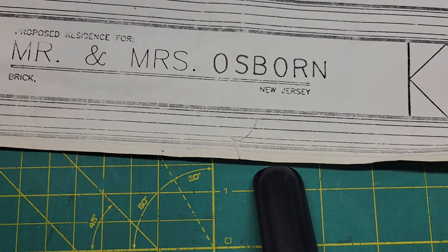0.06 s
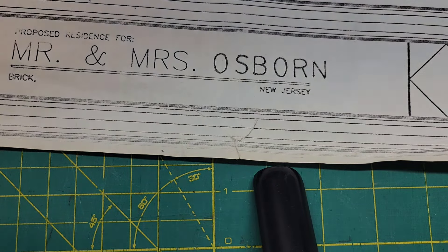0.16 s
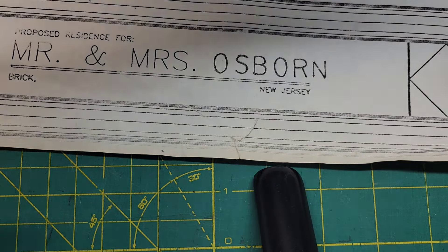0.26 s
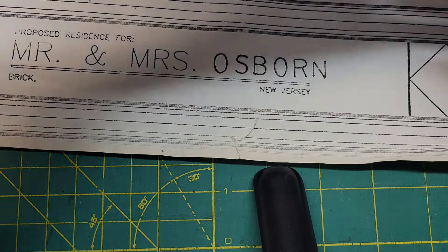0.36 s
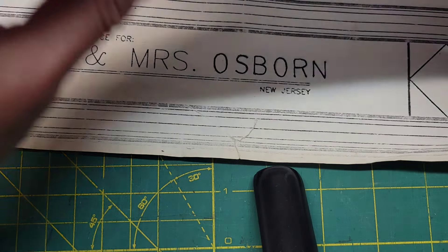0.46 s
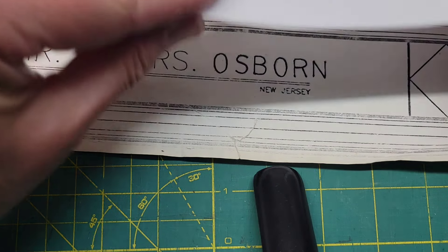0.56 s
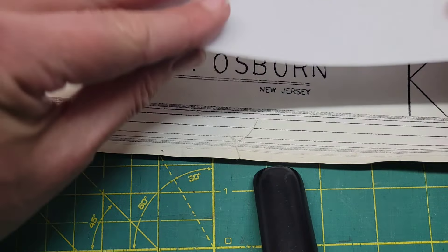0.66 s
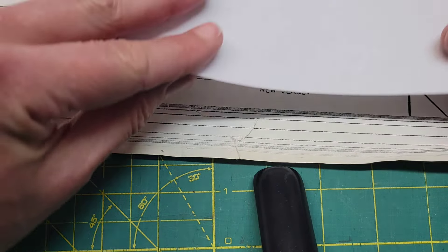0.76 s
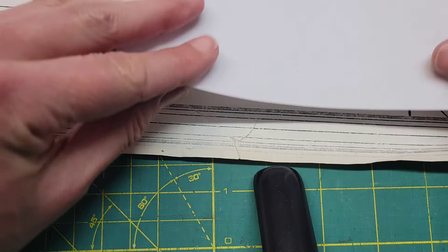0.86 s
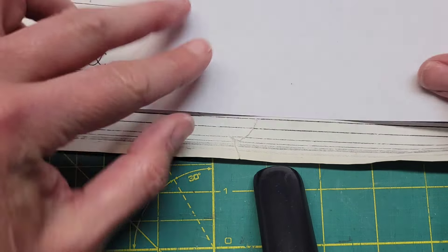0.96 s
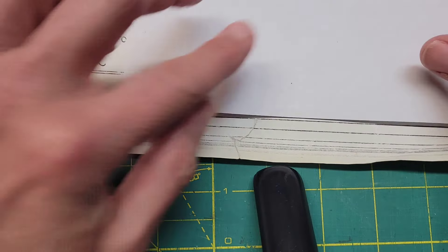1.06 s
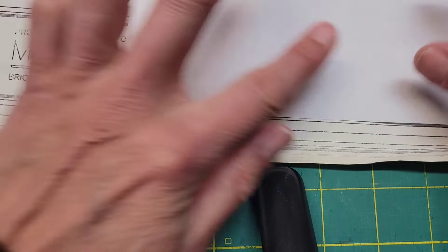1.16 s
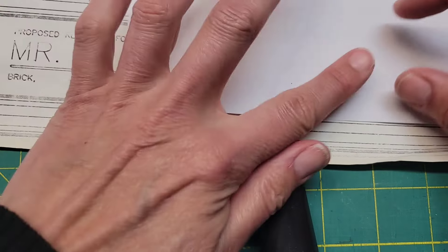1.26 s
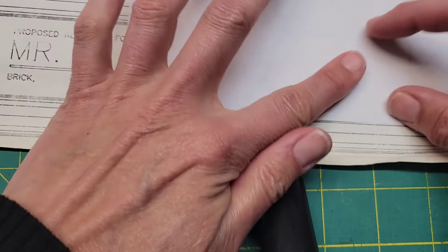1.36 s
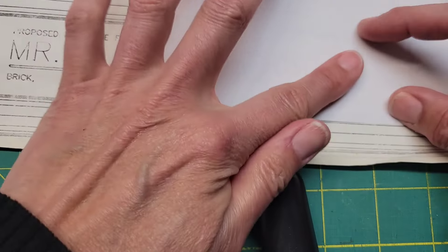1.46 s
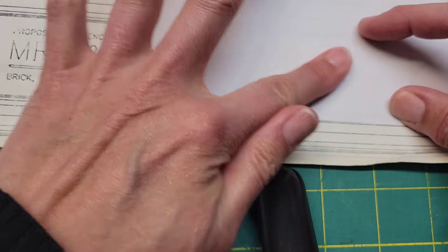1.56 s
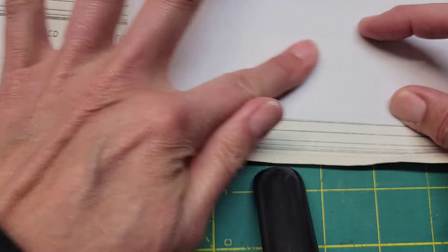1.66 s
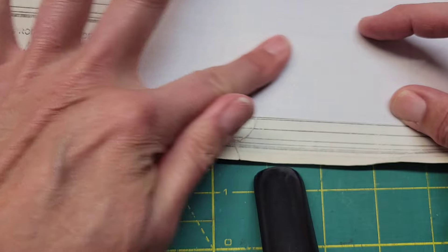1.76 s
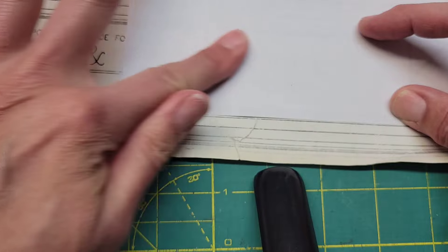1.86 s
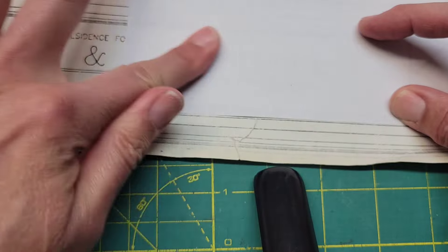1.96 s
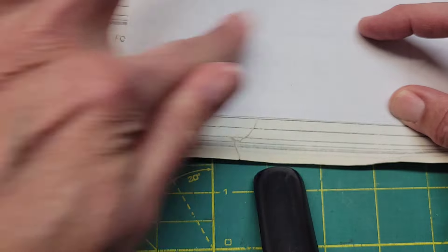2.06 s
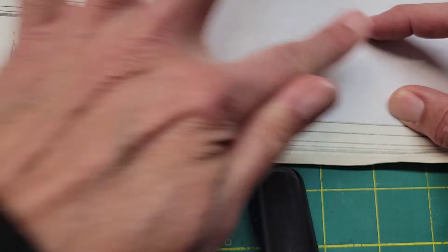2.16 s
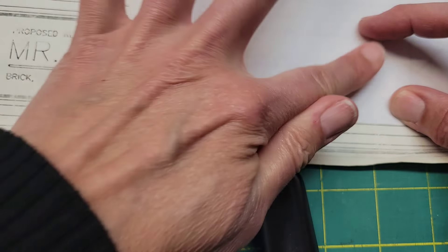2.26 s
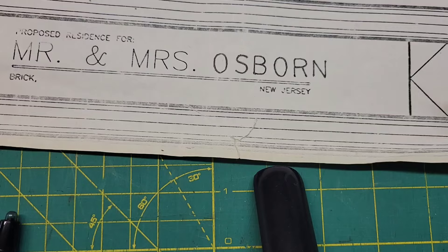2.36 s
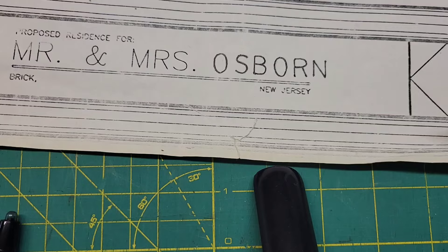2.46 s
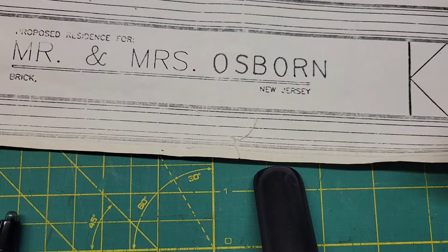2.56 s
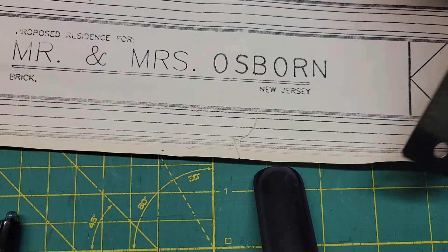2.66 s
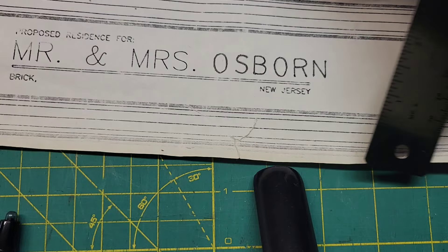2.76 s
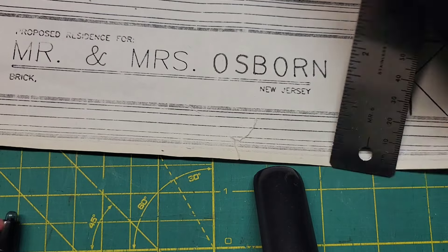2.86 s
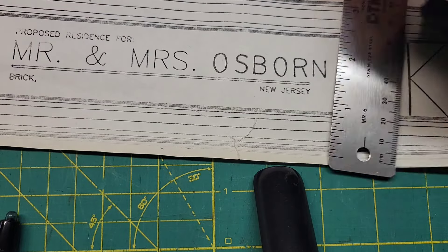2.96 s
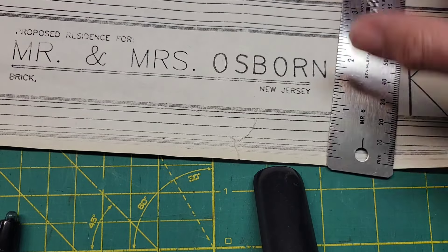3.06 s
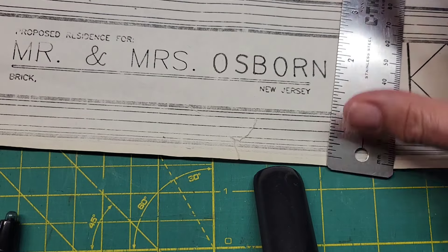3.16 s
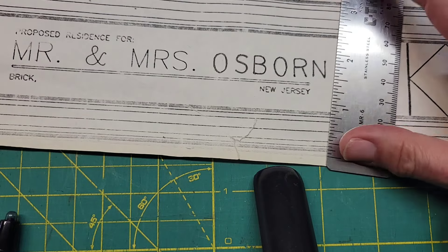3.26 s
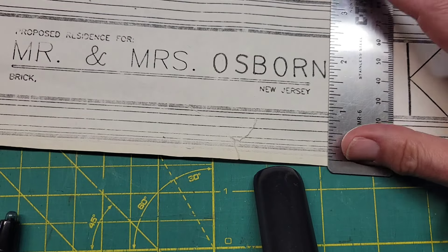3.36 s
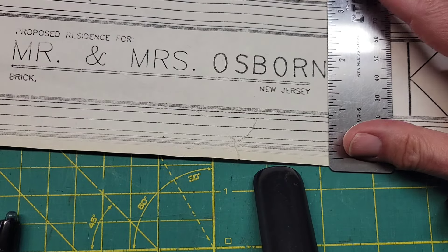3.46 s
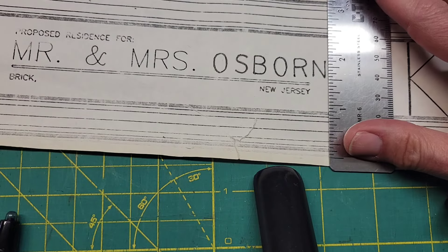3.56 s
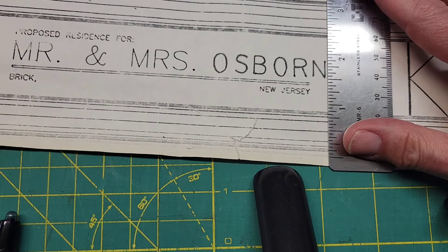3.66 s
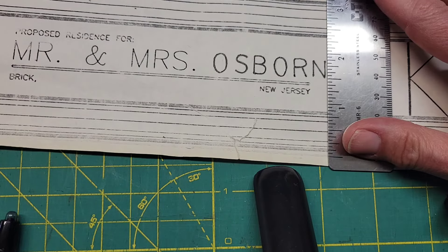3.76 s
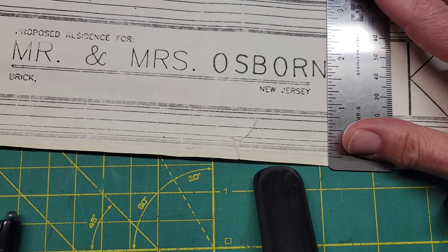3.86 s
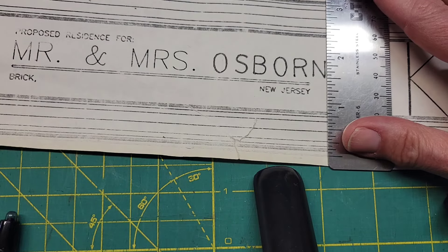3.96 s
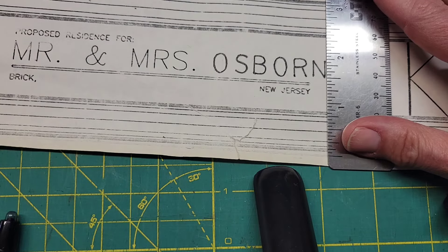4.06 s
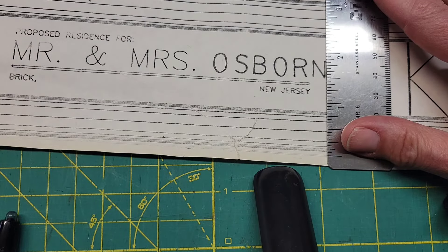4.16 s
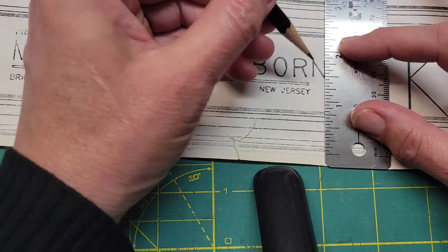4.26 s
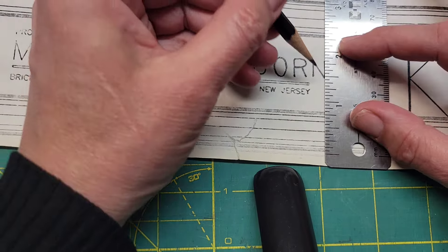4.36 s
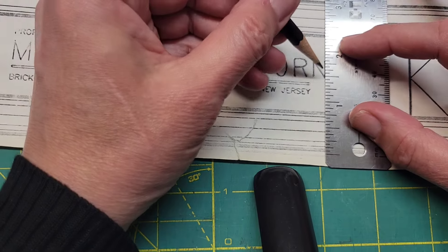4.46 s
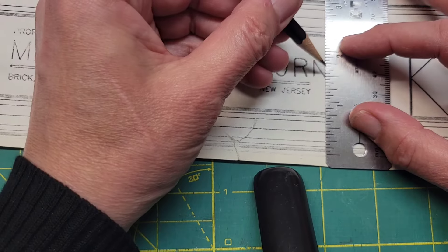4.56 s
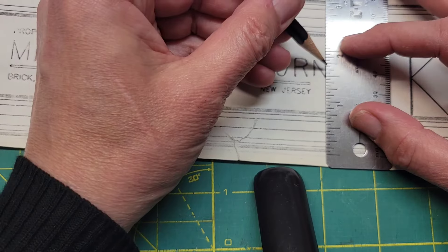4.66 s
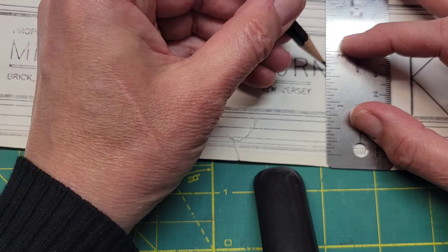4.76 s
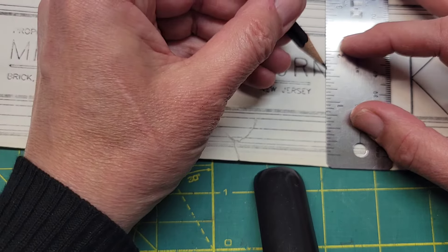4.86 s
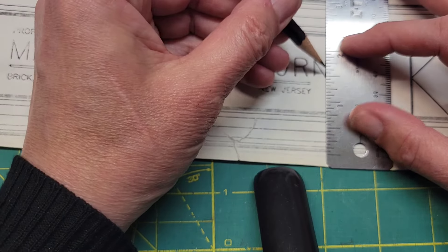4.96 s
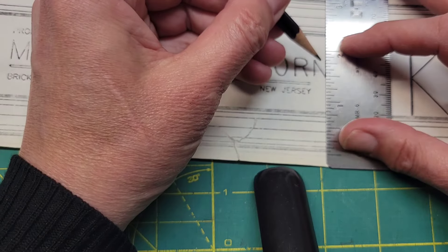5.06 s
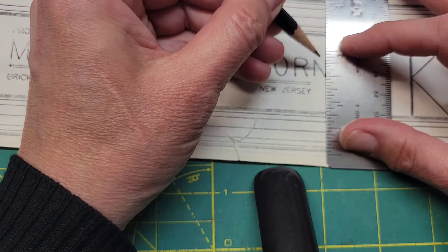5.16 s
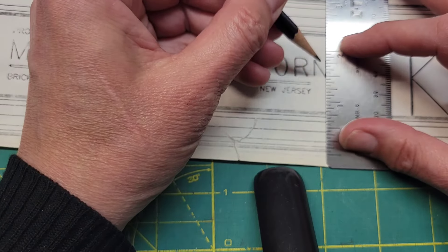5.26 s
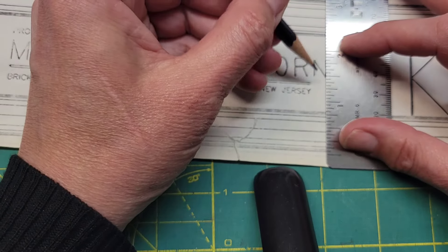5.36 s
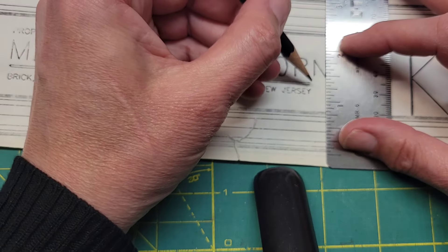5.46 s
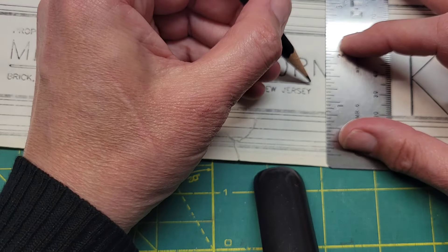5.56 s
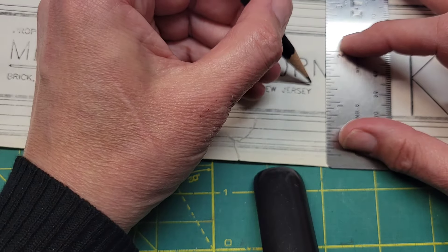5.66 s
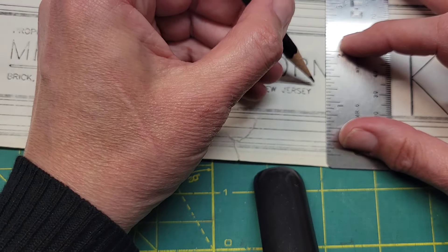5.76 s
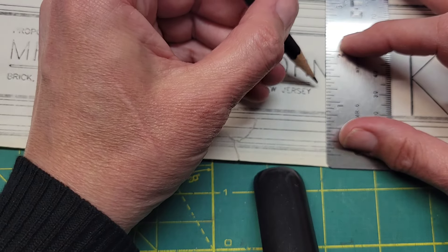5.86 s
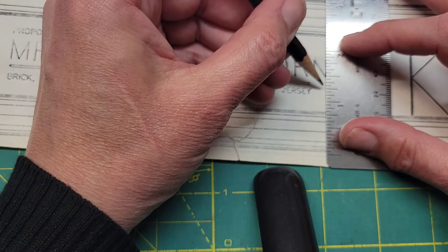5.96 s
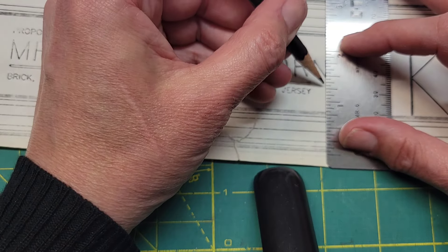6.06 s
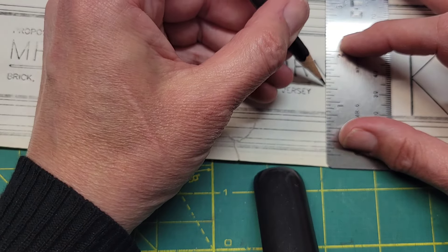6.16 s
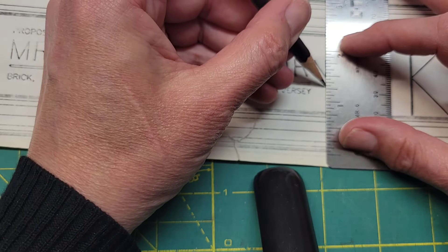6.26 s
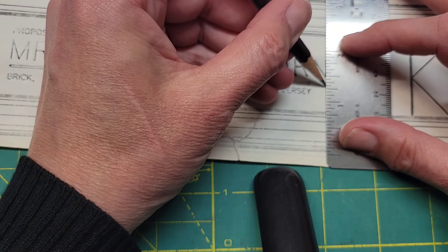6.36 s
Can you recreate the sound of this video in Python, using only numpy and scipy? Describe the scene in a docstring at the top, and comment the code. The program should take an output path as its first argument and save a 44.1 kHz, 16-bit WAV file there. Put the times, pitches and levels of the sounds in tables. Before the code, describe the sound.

Paper rustles and slides under hands in a quiet room, then a steel ruler is set down with one sharp clack.

```python
"""Paper and a steel ruler

Hands smooth paper on a cutting mat in a quiet workshop: fibres hiss, sheets buckle, creases snap.
A steel ruler is dragged in, touches, slaps flat and bounces, ringing with the table, then is nudged
into place. Ventilation rumble and faint microphone hiss lie underneath; later a hand comes to rest
on the table with a soft bump and three faint pips sound."""
import sys
import numpy as np
from scipy import signal
from scipy.fft import rfft, irfft, next_fast_len
from scipy.io import wavfile

SR = 44100
rng = np.random.default_rng(int(sys.argv[2]) if len(sys.argv) > 2 else 0)


def bounce(signal):
    """Save signal as a 16-bit WAV file at the path given by the first command-line argument."""
    frames = np.transpose(np.atleast_2d(signal))
    limited = np.clip(frames, -1, 1)
    pcm = np.round(limited * 32767).astype(np.int16)
    wavfile.write(sys.argv[1], SR, pcm)


N = 283328

# level rides of the rumble (ventilation, hands on the table) and the hiss, in sections: time_s, level_db
RUMBLE_RIDE = [
    [(0.0, -56.5), (0.44, -62), (1.08, -64), (1.8, -62), (2.12, -63), (2.303, -57)],
    [(2.312, -73), (2.52, -64), (2.85, -69.5), (3.1, -65), (3.77, -70.5), (4.42, -67), (5.5, -67),
     (6.42, -68.5)],
]
HISS_RIDE = [
    [(0, -63), (1.2, -80), (2.303, -76.5)],
    [(2.312, -80.5), (3.5, -83), (4.4, -79), (6.42, -84.5)],
]
# EQ curves of the rumble, the hiss, friction near the table and the bass-light room: freq_hz, gain_db
RUMBLE_EQ = [(12, -32.5), (20, -17.5), (53, -3.5), (80, -3.5), (113, -0.5), (156, -8), (176, -12),
             (290, -11), (460, -22), (782, -29.5), (852, -24.5), (977, -35), (1200, -28), (1560, -63),
             (2640, -120)]
HISS_EQ = [(410, -21), (700, -11.5), (1390, -9), (1530, -7), (1670, -12), (4480, -15), (4720, -19),
           (5170, -16), (5810, -23), (6880, -17), (9520, -23.5), (12500, -19), (15600, -19.5)]
FRICTION_EQ = [(250, 8), (800, -7), (1050, -9), (1300, 2), (1900, 1), (2500, -5), (3300, -2), (3800, 3),
               (4250, -4), (5300, 1), (6600, -4), (7500, 1), (12500, 2), (16000, 0)]
ROOM_EQ = [(100, -16), (400, -8), (1500, -4.5), (5000, -2), (15000, -1)]
# stereo image of the background bed and of close noises: freq_hz, left_right_correlation
BED_IMAGE = [(60, 1), (150, 0.57), (380, -0.41), (950, -0.53), (2380, -0.35), (5980, -0.08), (15000, -0.81)]
CLOSE_IMAGE = [(60, 0.94), (150, 0.82), (380, 0.27), (950, 0.27), (2380, 0.37), (5980, 0.057),
               (15000, 0.01)]
# reverb time of the workshop: freq_hz, t60_s
ROOM_DECAY = [(100, 0.18), (500, .25), (1500, 0.24), (5000, 0.23), (15000, 0.043)]
# faint pips: start_s, hold_s, level_db
PIP_CUES = [(4.24, .025, -84), (5.09, .025, -79), (6.099, .03, -84)]
# a hand settles on the table: start_s, rise_s, hold_s, fade_s, level_db
HAND_RESTS = [(4.57, .015, 0.091, 0.022, -61), (6.2, .015, 0.036, .06, -70), (0.058, 0.026, .1, .15, -58)]
# hands, sheets and the ruler's edge slide over paper; sheen and body are relative to the hiss:
# start_s, rise_s, hold_s, fade_s, hiss_db, sheen_db, body_db, pan_db
PAPER_SLIDES = [(0.0, 0.0074, 0.043, .02, -65, -2.5, -23, 1), (0.055, .004, 0.1, 0.26, -58, -10.5, -5.5, 1),
                (0.227, 0.013, .025, 0.11, -63.5, -8, 7.5, -5),
                (0.427, 0.0044, 0.0019, .23, -49, -9.5, -9, -2),
                (0.534, 0.042, 0.16, 0.3, -50.5, -6, -5.5, -1.5),
                (0.8, .03, 0.042, .03, -56.5, -19, -7.5, -2),
                (0.844, 0.026, 0.024, 0.11, -46, -3.5, -13, -1.5),
                (0.935, .035, 0.0046, 0.023, -52.5, -6, -27, -3),
                (0.988, 0.0093, .002, 0.11, -63.5, -1.5, -27, -2),
                (1.294, 0.0042, 0.066, 0.14, -66, 2, -14, -3.5),
                (1.497, 0.062, 0.12, 0.45, -67, 7, -6.5, -3), (1.727, 0.082, 0.19, .15, -70, 9, -4.5, -0.5),
                (2.066, .006, 0.0031, 0.039, -70.5, 12, -12, -2),
                (2.208, .008, 0.036, .03, -78.5, -4.5, 3, 3),
                (2.264, 0.0091, 0.0032, 0.024, -69.5, 4.5, -7, -4),
                (2.299, 0.075, .06, .9, -76, -6.5, 0, -12.5),
                (2.435, 0.002, 0.0047, 0.028, -68.5, 19, -11, -2),
                (2.76, 0.016, 0.042, .01, -56, 7, -21, -2.5),
                (2.821, 0.0041, 0.0015, 0.017, -45.5, -4, 6.5, -2),
                (2.841, 0.012, .03, .08, -61.5, 2, -14, -1), (2.99, 0.0092, .07, .02, -74.5, 3, -4, -1),
                (3.07, .008, 0.016, 0.29, -65, 6.5, -19, -3.5),
                (3.179, .035, 0.0032, 0.12, -68, 1.5, -3, -3), (3.24, 0.078, 0.0085, .2, -64, 3, -11.5, -3),
                (3.63, .015, .04, .1, -88, 9, -10, -4), (4.248, .01, .015, .03, -86, 7, -6, -7),
                (4.572, .008, .01, .04, -84, 1, -4, -2), (4.95, .015, .02, .05, -95, 12, -6, -2),
                (5.88, .01, .015, .04, -90.5, 7, -6, 0)]
# the sheet bends; body is relative to the buckling: start_s, rise_s, hold_s, fade_s, buckling_db, body_db
PAPER_BENDS = [(0.0, 0.0036, 0.0085, .04, -60, -25), (0.057, 0.0049, 0.043, 0.12, -62, -2.5),
               (0.087, 0.071, .003, 0.12, -51.5, -1), (0.235, 0.019, 0.0018, 0.033, -48, 1),
               (0.426, 0.0025, .1, 0.081, -57, 6.5), (0.539, 0.038, .002, 0.047, -47, -1),
               (0.791, 0.0056, 0.0022, 0.052, -52, 5.5), (0.881, 0.048, .005, 0.088, -60.5, 4),
               (1.498, 0.032, 0.094, 0.091, -74, 4.5), (2.15, 0.028, 0.012, 0.044, -57, -30),
               (2.199, .008, 0.026, .15, -52, -16.5), (2.263, 0.0051, 0.028, 0.0032, -54.5, -18),
               (2.819, .005, 0.013, .05, -51, -16), (2.987, 0.0061, 0.0038, 0.085, -51.5, -4.5),
               (3.201, 0.02, .002, 0.057, -53.5, -31), (5.039, .015, 0.043, .1, -75, -13)]
# creases let go; crack is relative to the level: start_s, level_db, pitch_hz, t60_s, pan_db, crack_db
CREASE_SNAPS = [(0.128, -44, 1230, 0.076, -8, -19), (0.137, -56, 1170, 0.035, 0.5, -29),
                (0.157, -40.5, 1030, 0.087, -4, -20), (0.254, -35.5, 1980, 0.069, 14.5, -32),
                (0.266, -40, 706, 0.12, 5, -28), (0.425, -47, 1220, 0.11, 4, 0),
                (0.447, -40, 1150, 0.13, -4, -18), (0.498, -39.5, 1260, 0.03, -4, -5),
                (0.5127, -31.5, 1330, 0.024, 1, -38), (0.541, -35, 1440, 0.038, -2, -23),
                (0.551, -34, 1240, 0.19, -3.5, -20), (0.563, -35.5, 2010, 0.094, -5, -5.5),
                (0.577, -32.5, 1590, 0.056, -11, -23), (0.7946, -31.5, 2120, 0.016, -4, -23),
                (0.924, -31.5, 5100, 0.019, 3, 10), (0.953, -39, 6960, 0.015, 0, -18),
                (0.973, -48.5, 4180, 0.037, -11, 12), (1.311, -50.5, 4900, 0.06, -8, 7.5),
                (1.324, -49, 7300, 0.069, 5, -17), (2.027, -50.5, 9000, 0.036, 6, -4),
                (2.153, -53.5, 440, 0.038, 3, -27), (2.213, -43.5, 404, 0.074, 14, -34),
                (2.2185, -37, 525, 0.02, 11, -15), (2.236, -45, 407, 0.016, -10, -37),
                (2.245, -44, 520, 0.034, 2, -35), (2.265, -44, 690, 0.012, 12, -13),
                (2.272, -42.5, 510, 0.01, 1, -2), (2.4388, -38.5, 2760, 0.026, -7.5, 2),
                (2.445, -46.5, 2430, 0.016, -8, -6), (2.766, -37, 4405, 0.01, -14, -16),
                (3.08, -53, 6850, 0.03, -3, -11), (3.17, -54, 8100, 0.034, 5, -11),
                (3.189, -47.5, 8370, 0.03, -7, -8)]
# modes of the ruler, damped by the paper, and of the table top: pitch_hz, level_db, t60_s
RULER_MODES = [(724, -18, 0.08), (1018, -21, 0.029), (1254.5, -5.5, .022), (1398.7, -2.5, 0.027),
               (1642, -9.5, 0.012), (1810, -13.5, 0.018), (2063, -11, 0.013), (3010, -7, 0.0046),
               (3590, -7, .012), (4440, -9, .012), (5100, -12, 0.0078), (6940, -19.5, .012),
               (7870, -22, 0.031), (10200, -22.5, 0.004)]
TABLE_MODES = [(115, -11, 0.2), (143, -7, 0.16), (189, -8, 0.22), (230, -12, 0.098), (283, -6.5, 0.23),
               (330, -16, 0.046), (406, -18, 0.045), (465, -16, .08)]
# the ruler's edge drags over paper: time_s, level_db
DRAG_RIDE = [(2.766, -53), (2.778, -58), (2.8, -63.5), (2.822, -60.5), (2.87, -67.5)]
# ruler hits; crack and thud are relative to the blow: start_s, blow_db, brightness_hz, crack_db, thud_db
RULER_HITS = [(2.8239, -34.5, 3000, -16.5, -19.5), (2.8412, -39.5, 4000, -15, -10),
              (2.9031, -10, 4360, 0, -17.5), (2.9085, -7.5, 9150, -2, -14), (2.9130, -16, 2980, -20.5, -10),
              (2.9168, -22, 2500, -21.5, -4), (2.945, -19, 3600, -43.5, -20.5),
              (2.96, -25.5, 2540, -30, -11), (2.963, -29.5, 3000, -11, -5.5),
              (2.9706, -34, 3040, -2.5, -6.5), (3.2163, -44.5, 1200, -21, -6),
              (3.7393, -46, 12000, -20, -26.5)]

TIME_S = np.arange(N) / SR


def from_db(db):
    """Decibels to gain."""
    return 10 ** (np.asarray(db) / 20)


def unit_rms(x):
    """Scale to an rms of 1."""
    return x / np.sqrt(np.mean(x ** 2) + 1e-20)


def pan(pan_db):
    """Left and right gains, pan_db apart; positive leans left."""
    return from_db([[pan_db / 2], [-pan_db / 2]])


def band_filter(x, order, hz, kind):
    """Butterworth filter."""
    return signal.sosfilt(signal.butter(order, hz, kind, fs=SR, output="sos"), x)


def at_hz(curve, hz):
    """Read a curve on a log-frequency axis."""
    freqs, values = np.array(curve).T
    return np.interp(np.log(hz), np.log(freqs), values)


def ride(sections, rest_db):
    """A fader ride in dB, sitting at rest_db outside its sections."""
    level_db = np.full(N, float(rest_db))
    for section in sections:
        times, levels = np.array(section).T
        inside = (TIME_S >= times[0] - .001) & (TIME_S <= times[-1] + .001)
        level_db[inside] = np.interp(TIME_S[inside], times, levels)
    return level_db


def drift(rate_hz):
    """A smooth random wobble, rms 1."""
    step, settle = 40, 2000
    pole = np.exp(-2 * np.pi * rate_hz * step / SR)
    noise = rng.standard_normal(N // step + settle + 2)
    slow = signal.lfilter([1], [1, -2 * pole, pole * pole], noise)[settle:]
    return np.interp(np.arange(N) / step, np.arange(len(slow)), unit_rms(slow))


def swell(start, rise, hold, fade):
    """Span and gain of one gesture: up 18 dB, hold, then down 60 dB over two fade times."""
    rise, hold, fade = np.maximum([rise, hold, fade], .001)
    length_s = rise + hold + 2 * fade
    t = np.arange(round(length_s * SR)) / SR
    level_db = np.interp(t, [0, rise, rise + hold, length_s], [-18, 0, 0, -60])
    at = round(start * SR)
    return slice(at, at + len(t)), from_db(level_db)


def stereo_noise(eq, image, low_hz, high_hz):
    """A band of equalised noise, its width set by mid-side mixing; rms 1."""
    hz = np.maximum(np.arange(N // 2 + 1) * SR / N, 1)
    skirts = 1 / np.sqrt((1 + (low_hz / hz) ** 14) * (1 + (hz / high_hz) ** 14))
    mid, side = rfft(rng.standard_normal((2, N))) * from_db(at_hz(eq, hz)) * skirts
    correlation = at_hz(image, hz)
    spectrum = np.sqrt(1 + correlation) * mid + np.sqrt(1 - correlation) * side * [[1], [-1]]
    return unit_rms(irfft(spectrum, N))


def ring(drive, hz, t60):
    """One resonance: a unit click starts a dying sine of height 1."""
    radius, angle = from_db(-60 / (t60 * SR)), 2 * np.pi * hz / SR
    return signal.lfilter([0, np.sin(angle)], [1, -2 * radius * np.cos(angle), radius ** 2], drive + 1e-18)


def crack(t60, low_hz, high_hz):
    """A bright, fast-dying noise transient, partly different on each side."""
    t = np.arange(SR // 10) / SR
    noise = rng.standard_normal(len(t)) + rng.standard_normal((2, len(t)))
    attack = 1 - np.exp(-t / .0006)
    return .4 * band_filter(noise, 2, [low_hz, high_hz], "band") * attack * from_db(-60 * t / t60)


def background():
    """The bed: wavering ventilation rumble under smooth microphone hiss."""
    rumble = stereo_noise(RUMBLE_EQ, BED_IMAGE, 15, 2100) * pan(-1.7)
    rumble *= from_db(ride(RUMBLE_RIDE, rest_db=-66.5) + 1.3 * drift(9))
    hiss = stereo_noise(HISS_EQ, BED_IMAGE, 560, 18000) * pan(-.95)
    return rumble + hiss * from_db(ride(HISS_RIDE, rest_db=-86))


def pips():
    """Brief faint tones: noise through one narrow resonance."""
    tone = unit_rms(ring(rng.standard_normal(N), hz=857, t60=.08))
    envelope = np.zeros(N)
    for start, hold, level_db in PIP_CUES:
        span, gain = swell(start, rise=.0098, hold=hold, fade=.036)
        envelope[span] += from_db(level_db) * gain
    return envelope * tone


def workshop_reverb(dry):
    """A short room tail: ten feedback delays a side, dying fastest in the top end."""
    size = next_fast_len(N + SR)
    hz = np.maximum(np.arange(size // 2 + 1) * SR / size, 1)
    t60, delays_s = at_hz(ROOM_DECAY, hz), rng.uniform(.006, .03, (2, 10))
    response = np.zeros((2, len(hz)), complex)
    for k in range(10):
        delay = delays_s[:, k, None]
        loop = from_db(-60 * delay / t60) * np.exp(-2j * np.pi * hz * delay)
        response += (-1) ** k * loop / (1 - loop)
    send = rfft(dry.mean(axis=0), size) * from_db(at_hz(ROOM_EQ, hz))
    return irfft(send * response, size)[:, :N]


def hand_bumps():
    """The weight of a hand settling on the table makes a soft, low bump."""
    weight = np.zeros(N)
    for *shape, level_db in HAND_RESTS:
        span, gain = swell(*shape)
        weight[span] += from_db(level_db) * gain
    return weight * stereo_noise([(20, 0), (20000, 0)], CLOSE_IMAGE, 70, 336)


def paper_gestures():
    """Stereo gains of the hiss, sheen, body and buckling layers; overlapping gestures add in power."""
    power = np.zeros((4, 2, N))
    for *shape, hiss_db, sheen_db, body_db, pan_db in PAPER_SLIDES:
        span, gain = swell(*shape)
        layers = from_db(hiss_db + np.array([0, sheen_db, body_db, body_db - 11]))   # slight buckling
        power[:, :, span] += (layers[:, None, None] * pan(pan_db) * gain) ** 2
    for *shape, buckling_db, body_db in PAPER_BENDS:
        span, gain = swell(*shape)
        layers = from_db([buckling_db + body_db, buckling_db])
        power[2:, :, span] += (layers[:, None, None] * pan(-2) * gain) ** 2
    return np.sqrt(power)


def paper_friction():
    """Catching fibres make a dense hiss; the sheet's body and its buckling sound lower and grainier."""
    # hiss, sheen, body, buckling: low_hz, high_hz, grain_db, grain_hz
    layers = [(2600, 7000, 1.2, 40), (7000, 17000, 1.1, 50), (1000, 2600, 2.2, 60), (250, 1000, 2.5, 40)]
    out, pressure = 0, drift(30)
    for (low_hz, high_hz, grain_db, grain_hz), gain in zip(layers, paper_gestures()):
        edges, layer = np.geomspace(low_hz, high_hz, num=4), 0
        for low, high in zip(edges, edges[1:]):
            noise = stereo_noise(FRICTION_EQ, CLOSE_IMAGE, low, high)
            share_db = at_hz(FRICTION_EQ, np.sqrt(low * high)) + 10 * np.log10(high - low)
            colour_db = 1.5 * drift(6)   # the colour shifts as the hand travels
            flutter_db = grain_db * (.7 * pressure + drift(grain_hz))
            layer += noise * from_db(share_db + colour_db + flutter_db)
        out += unit_rms(layer) * gain
    return out


def crease_snaps():
    """A crease lets go: quick slips ring the patch of sheet around it, topped by a bright crack."""
    size = SR // 10
    out, t = np.zeros((2, N + size)), TIME_S[:size]
    for start, level_db, hz, t60, pan_db, crack_db in CREASE_SNAPS:
        slips = rng.standard_normal(size) * from_db(-60 * t / t60) * (1 - np.exp(-t / .0005))
        slips[0] = from_db(14)   # the first slip is the hardest
        slips = band_filter(slips, 3, [hz / 1.5, min(hz * 2.34, SR / 3)], "band")
        body = ring(slips, hz, 4.5 / hz) + .6 * ring(slips, 1.45 * hz, 5 / hz)
        snap = body / np.abs(body).max() + from_db(crack_db) * crack(t60 / 2, 4000, 15000)
        at = round(start * SR)
        out[:, at:at + size] += from_db(level_db) * pan(np.clip(pan_db, -6, 4)) * snap
    return out[:, :N]


def ruler_drag():
    """The edge scraping over paper sets the steel humming, less damped than when it lies flat."""
    scrape = from_db(ride([DRAG_RIDE], rest_db=-130) + 2 * drift(80))
    hum = 0
    for hz, level_db, t60 in RULER_MODES:
        mode = unit_rms(ring(rng.standard_normal(N), hz, 4.7 * t60))
        hum += mode * from_db(.94 * level_db)   # slightly more even than when struck
    return scrape * hum


def hiss_swell(start_s=2.8985, peak_s=2.9032):
    """A bright hiss swells for 5 ms into the slap."""
    envelope = np.interp(TIME_S, [start_s, peak_s, peak_s + .002], [0, 1, 0])
    return from_db(-30) * envelope * stereo_noise(FRICTION_EQ, CLOSE_IMAGE, 2000, 15000)


def ruler_rattle(start_s=2.915, end_s=2.99):
    """The ruler shivers on the paper after the slap: a bright, fluttering fizz."""
    envelope = np.interp(TIME_S, [start_s - .005, start_s, end_s - .02, end_s], [.0048, 1, .025, .0038])
    shiver = from_db(-43 + 2.5 * drift(120))
    return envelope * shiver * stereo_noise(FRICTION_EQ, CLOSE_IMAGE, 3700, 21000)


def ruler_hits():
    """Each hit rings steel and table, duller for a softer contact; returns steel, wood and crack stems."""
    steel, wood, cracks = np.zeros(N), np.zeros(N), np.zeros((2, N))
    size = SR // 2
    for start, blow_db, brightness_hz, crack_db, thud_db in RULER_HITS:
        at = round(start * SR)
        contact = band_filter(signal.unit_impulse(size), 2, brightness_hz, "low")
        for stem, modes, drive_db in ((steel, RULER_MODES, blow_db), (wood, TABLE_MODES, blow_db + thud_db)):
            for hz, level_db, t60 in modes:
                gain = from_db(drive_db + level_db + rng.normal(0, 1))
                stem[at:at + size] += gain * ring(contact, hz, t60)
        cracks[:, at:at + SR // 10] += from_db(blow_db + crack_db) * crack(.03, 3000, 10000) * pan(3.6)
    return steel, wood, cracks


def ruler():
    """Drag, hiss swell, hits and rattle; the ringing sits to the right and arrives there first."""
    steel, wood, cracks = ruler_hits()
    steel = band_filter(steel + ruler_drag(), 4, 950, "high")   # a narrow strip radiates little bass
    right = steel + band_filter(wood, 2, 110, "high")
    left = np.interp(TIME_S - .00007, TIME_S, right)
    return (np.array([left, right]) + cracks + ruler_rattle() + hiss_swell()) * pan(-3.5)


def scene():
    """Paper and ruler up close over the bed; only snaps and ruler feed the reverb."""
    accents = crease_snaps() + ruler()
    close = paper_friction() + accents + hand_bumps()
    return close + from_db(-14) * workshop_reverb(accents) + background() + pips()


def record(dry):
    """The level dips for 9 ms, and a steep low-pass takes off the very top."""
    dip = np.where((TIME_S > 2.303) & (TIME_S < 2.312), from_db(-14), 1)
    return signal.sosfilt(signal.cheby2(20, 50, 16050, fs=SR, output="sos"), dry * dip)


dry = scene()
out = record(dry)
bounce(out)
```